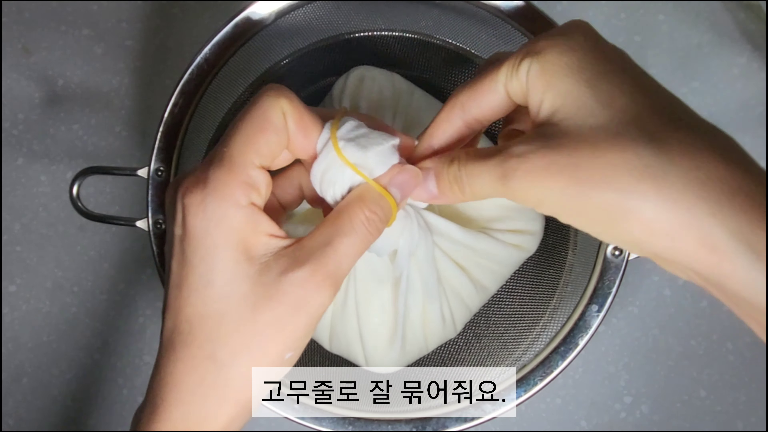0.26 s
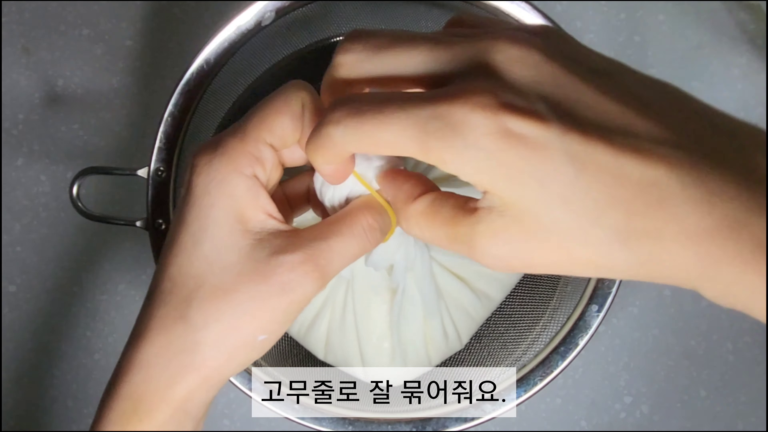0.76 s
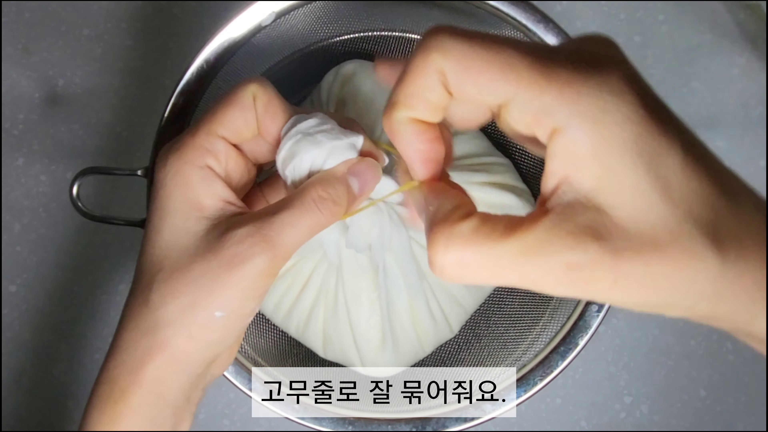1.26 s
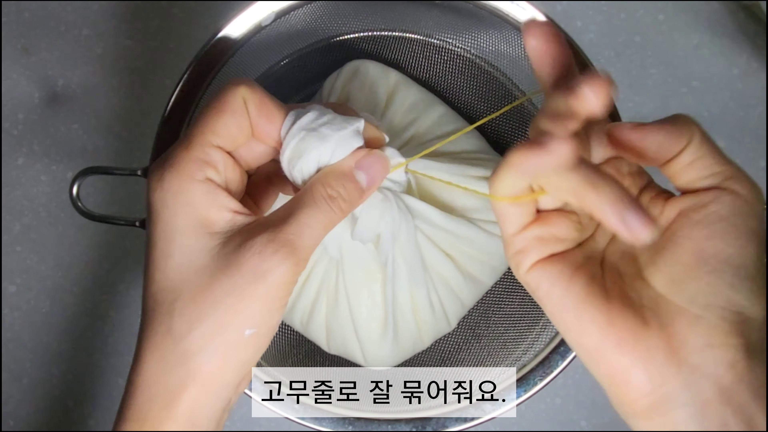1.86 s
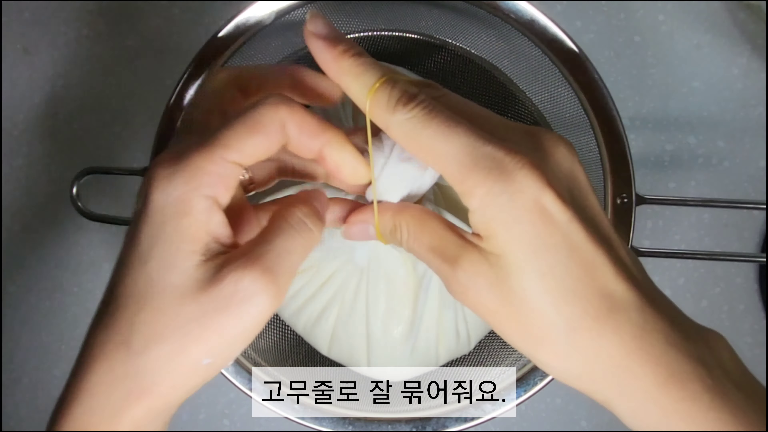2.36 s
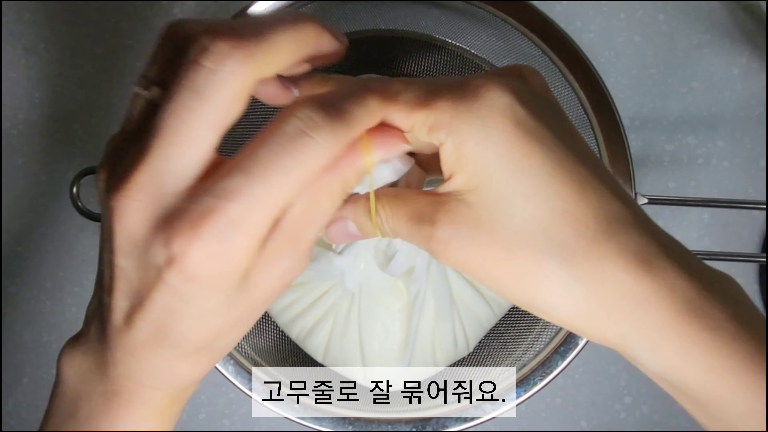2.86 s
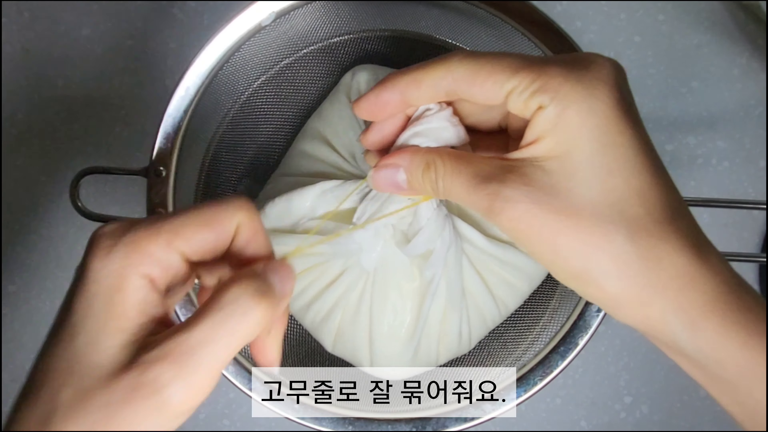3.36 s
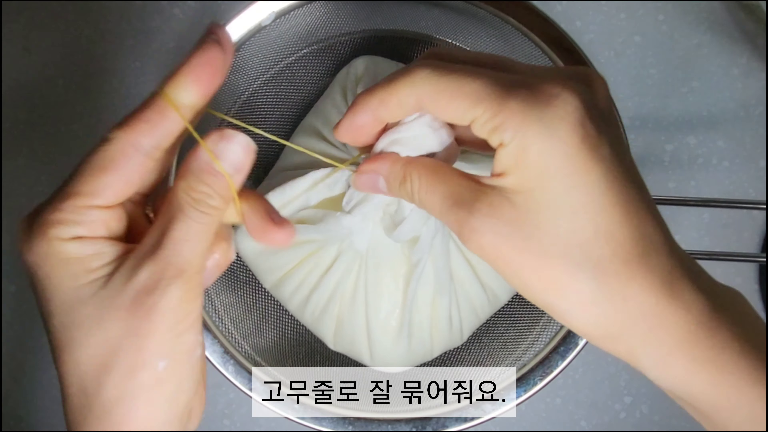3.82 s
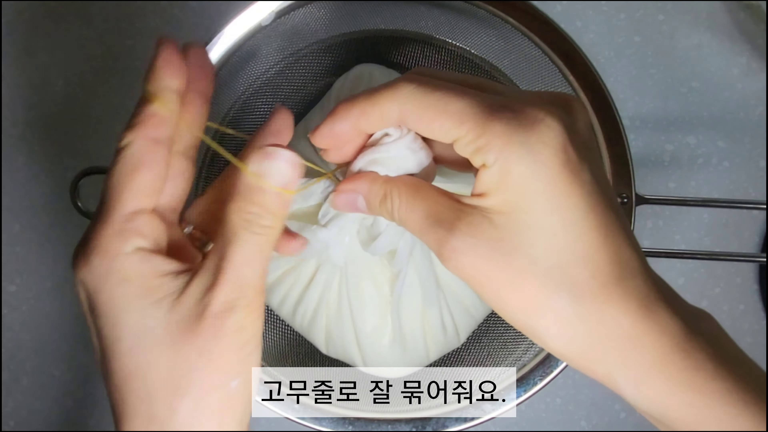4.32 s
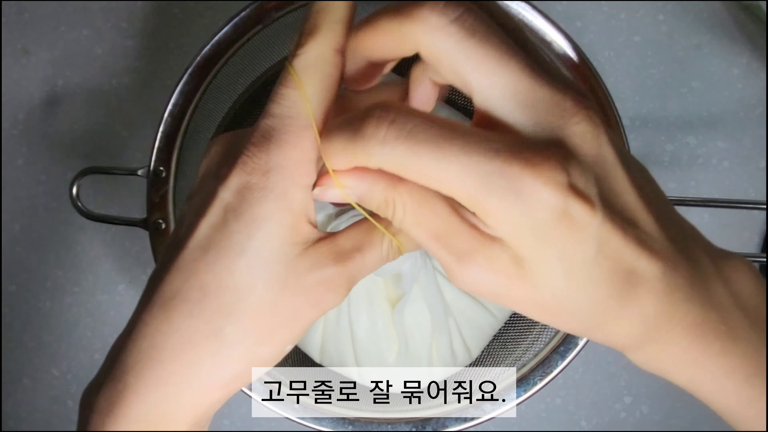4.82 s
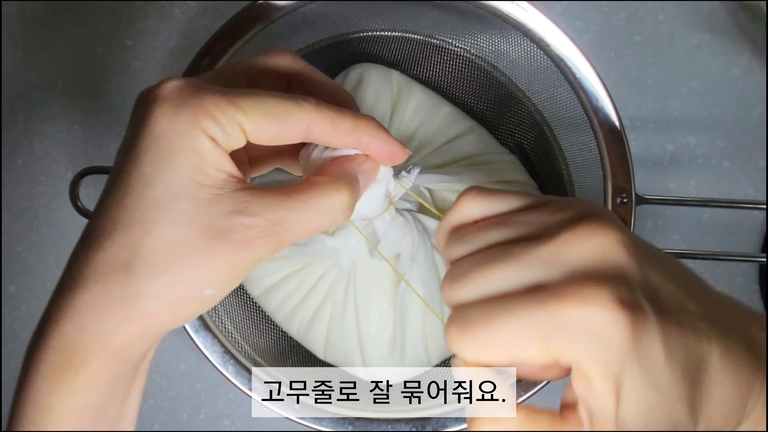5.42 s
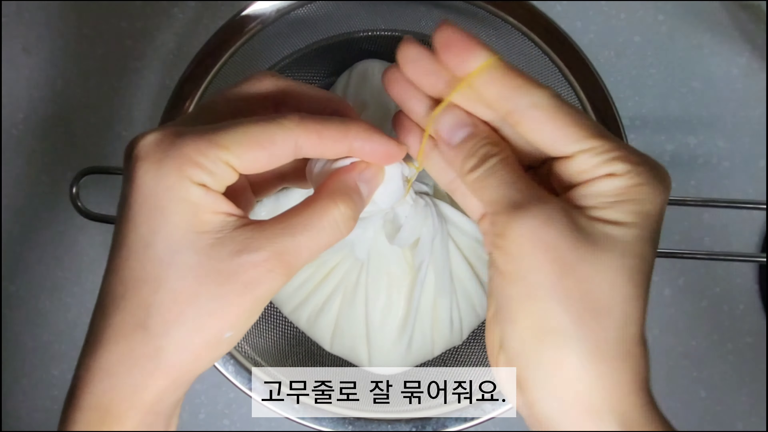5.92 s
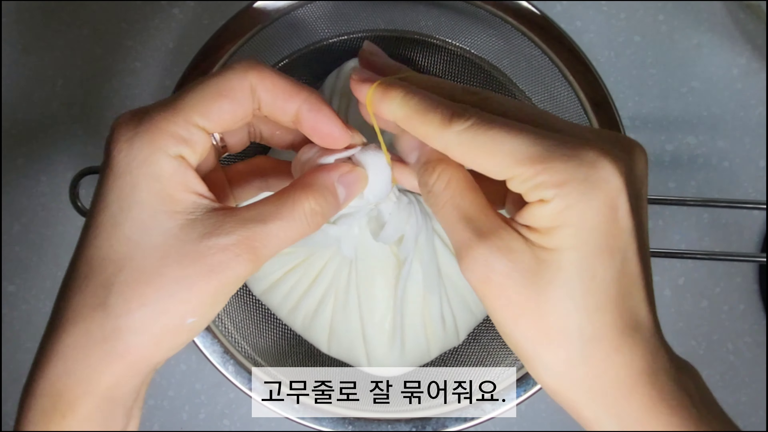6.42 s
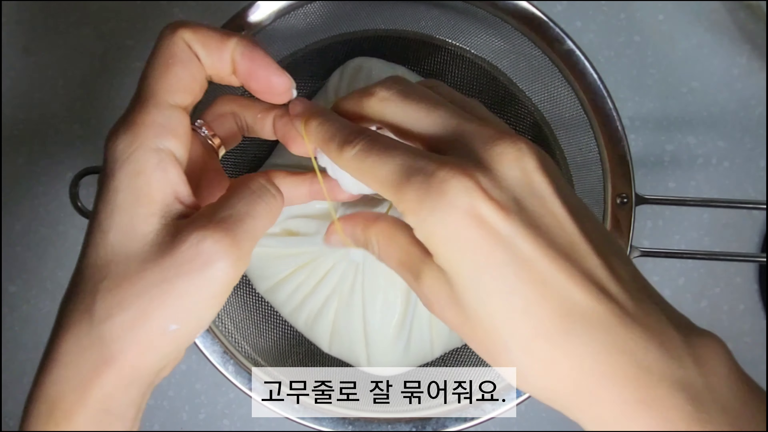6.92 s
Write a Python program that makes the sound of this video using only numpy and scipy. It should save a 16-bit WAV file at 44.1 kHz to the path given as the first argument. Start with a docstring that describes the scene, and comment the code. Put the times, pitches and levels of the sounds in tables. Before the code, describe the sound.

Close stereo pickup in a kitchen sink: fingers softly brush a cloth bundle over faint room hum, with tiny elastic ticks. A rubber band snaps bright and dry, first weakly, then strongly around three seconds. Later snaps follow among rustles, a low engine drone swells and climbs outside, and the hardest snap comes at the very end.

```python
"""Fingers hiss on cloth over a faint room hum; then a rubber band ticks and snaps as hands wind it round
the neck of a cloth bundle in a steel strainer in a kitchen sink. Impacts are shaped noise bursts, freed
strands are decaying sines, rubs are swelling noise and the shifting bundle is a low, wavering sine. Basin
resonances, a near-wall echo and kitchen tails answer. A low drone, like an engine outside, swells and
climbs: gliding sines over rumbling noise."""
import sys
import numpy as np
from scipy import signal
from scipy.fft import rfft, irfft, next_fast_len
from scipy.io import wavfile
from scipy.ndimage import map_coordinates

SR = 44100
rng = np.random.default_rng(int(sys.argv[2]) if len(sys.argv) > 2 else 0)


def waveform_to_disk(signal):
    """Save audio, clipped to [-1, 1], as 16-bit WAV at the path in sys.argv[1]."""
    frames = np.transpose(np.atleast_2d(signal))
    scaled = np.clip(frames, -1, 1) * 32767
    samples = np.round(scaled).astype(np.int16)
    wavfile.write(sys.argv[1], SR, samples)


N = 316638  # samples

# Source levels precede any trims passed in scene(); noise spectra are relative, as noise() sets rms to 1.
# band snaps home: start_s, crack_db, crack_tilt_db_per_octave, hollow_low_hz, hollow_high_hz, hollow_gain_db,
# slap_re_crack_db, slap_pitch_hz, thud_re_crack_db, left_minus_right_db
SNAPS = [(1.5053, -49.5, 0.7, 7700, 9900, 7.1, -7.5, 1020, -7, 1.2),
         (2.2972, -43, 0.3, 6050, 9700, 7.5, -19, 1200, -18, -0.73),
         (3.2785, -31.5, -0.2, 7500, 9400, 5, -11.5, 1220, -20, 2),
         (4.7121, -38, 0, 6350, 9600, 15, -5.5, 1130, -17, 1.8),
         (5.4035, -52.5, 0, 6480, 9000, 3, 1, 1150, -7, 0),
         (5.4284, -45, -4.5, 3200, 10300, 3.3, 4, 940, -4, 1.5),
         (6.432, -42, 1.5, 6285, 8000, 2.4, -7, 901, -10, -0.26),
         (7.1748, -20, 0, 3490, 6000, 3.3, -7, 1240, -24, -1)]
# small slips of the band: start_s, tick_db, slap_re_tick_db
TICKS = [(0.5806, -62, -30), (0.821, -66, -27), (1.2075, -65, -5), (1.478, -56, -27), (1.5014, -56, -6),
         (1.562, -64, -16), (2.203, -63.5, -18), (2.545, -70, 2.5), (3.252, -50.5, -11), (3.3265, -56, -6),
         (3.447, -53.5, -21), (3.683, -65, -25), (3.825, -52, -10), (4.048, -56.5, -24),
         (4.0841, -47.5, -11), (4.575, -63.5, -0.5), (4.784, -55.5, -10), (5.272, -62, -2),
         (5.2895, -62, -4), (5.333, -61, -2), (5.478, -48.5, -12.5), (6.8462, -60, -15),
         (7.0885, -52.5, -18), (7.151, -58.5, -15)]
# stretched strands left ringing: start_s, settled_pitch_hz, level_db
TWANGS = [(3.281, 468, -37.5), (3.279, 235, -46), (3.308, 205, -40.5), (3.305, 118, -39),
          (3.305, 90, -43.5), (5.428, 370, -35.5), (5.429, 720, -41.5), (6.432, 412, -34.5),
          (7.171, 250, -36)]
# fingers rub the cloth: start_s, length_s, level_db, pressure_0_to_1
RUBS = [(0.0, 0.11, -70, 0.16), (0.084, 0.24, -76.5, 0.14), (0.289, 0.15, -78, 0.25), (0.604, 0.19, -90, 1),
        (0.635, 0.06, -83, 0), (1.203, 0.035, -74.5, 0.4), (1.322, 0.091, -74.5, 0.05),
        (1.396, 0.12, -79, 0), (1.709, 0.07, -82, 0), (1.882, 0.11, -79, 0), (1.995, 0.06, -77.5, 0.13),
        (2.031, 0.19, -83.5, 0.16), (2.319, 0.31, -76, 0.43), (2.407, 0.051, -71, 0.34),
        (2.63, 0.14, -78, 0.67), (2.819, 0.06, -81, 0.2), (2.947, .05, -87, 0), (3.123, 0.055, -81, .1),
        (3.486, 0.046, -81, 0.2), (3.66, 0.099, -77.5, 0.05), (4.039, 0.025, -71, 0),
        (4.637, 0.12, -76.5, 0.76), (4.771, 0.26, -78, 0.58), (5.089, 0.22, -76, 0.55),
        (5.246, 0.095, -73, 0.49), (5.309, 0.11, -75, 0.6), (5.56, 0.057, -79, .1), (5.747, .04, -80, 0),
        (5.861, 0.15, -75.5, 0.03), (5.94, 0.16, -72, 0), (6.085, 0.05, -73.5, 0.26),
        (6.145, 0.054, -75.5, 0.24), (6.484, 0.087, -76.5, 0.45), (6.637, 0.13, -78, 0.95),
        (7.095, 0.24, -72, 0.4)]
# bundle shifts in the strainer: start_s, length_s, pitch_hz, level_db (centres of the waver)
SHIFTS = [(5.744, 0.05, 75, -52.5), (5.786, 0.11, 115, -49), (5.981, 0.083, 90.6, -55.5)]
# band whipping cloth: freq_hz, density_db_per_hz
CRACK_SPECTRUM = [(200, -46), (1500, -17.5), (3500, -11.5), (5000, -5.5), (6300, -7.5), (7700, -4),
                  (9600, -7), (11500, -4), (14000, -4.5), (16000, -16)]
# band on skin: freq_hz, density_db_per_hz
SLAP_SPECTRUM = [(200, -36), (640, -22), (900, -3.5), (1200, 0), (2100, -6.5), (3300, -10), (5000, -14.5),
                 (9000, -39), (16000, -65)]
# jolt of the soft bundle: freq_hz, density_db_per_hz
THUD_SPECTRUM = [(30, -43), (100, -3), (250, -4.5), (400, -14), (750, -13.5), (1300, -25), (3000, -54),
                 (8000, -90)]
# band slipping over folds: freq_hz, density_db_per_hz
TICK_SPECTRUM = [(200, -52), (1500, -18), (3500, -18), (5000, -7.5), (6300, -5.5), (7700, -1.5), (9600, -6),
                 (11500, -5), (14000, -6.5), (16000, -13)]
# hiss on the weave before tilt: freq_hz, density_db_per_hz
CLOTH_SPECTRUM = [(1500, -14), (3500, -12.5), (5200, -5), (7500, -1.5), (10000, 0), (12000, 1.5),
                  (16000, -1)]
# low rustle of the bundle: freq_hz, density_db_per_hz
BUNDLE_SPECTRUM = [(30, -39), (120, -33), (250, -3), (420, 6), (700, -1), (1200, -16), (2700, -14),
                   (4000, -33), (9000, -40), (16000, -68)]
# resonances of basin and strainer: centre_hz, width_hz, gain_db
BASIN_MODES = [(1222, 36, -5), (1740, 25, -11), (2260, 70, -2), (2860, 76, -8), (5810, 160, -7),
               (6490, 140, -1.5), (8470, 110, -13), (9100, 220, -7)]
# decay of the kitchen: freq_hz, t60_s
KITCHEN_T60 = [(200, 0.35), (1500, 0.34), (6000, 0.31), (15000, 0.17)]
# engine throb, first order: time_s, pitch_hz, level_db
DRONE = [(3.7, 28.84, -66), (3.77, 28.5, -57.5), (4.35, 33.62, -41), (4.6, 33.6, -50.5), (4.71, 33.47, -47),
         (5.0, 31.78, -58), (5.32, 33.98, -40), (5.7, 36.68, -78), (5.74, 36.78, -56), (6.01, 40.9, -43),
         (6.17, 43, -66), (6.28, 46.06, -47.5), (6.37, 48.82, -50.5), (6.45, 50.13, -49), (7.15, 51.4, -57),
         (7.18, 50.6, -55)]
# higher engine whine: time_s, pitch_hz, level_db
WHINE = [(5.55, 178, -76), (6.0, 198, -63), (6.25, 203, -58.5), (6.45, 218, -58), (6.75, 224, -59.5),
         (7.18, 218, -55)]
# engine rumble: freq_hz, density_db_per_hz
RUMBLE_SPECTRUM = [(30, -26), (70, -1), (125, 2), (200, -4.5), (290, -11.5), (450, -12.5), (800, -23.5),
                   (1500, -29.5), (2600, -35), (7000, -60)]
# rise of the rumble: time_s, level_db
APPROACH = [(0, -85), (3.2, -65.5), (4.3, -62.5), (7.18, -54)]
# room air: freq_hz, density_db_per_hz
AIR_SPECTRUM = [(20, -15), (65, 1.5), (96, -13), (122, -8), (165, -18), (215, -15.5), (300, -27),
                (450, -28), (950, -34), (1290, -44), (3500, -50), (6000, -50), (7400, -44), (8200, -50),
                (9800, -44), (11300, -45), (11900, -49.5)]
# appliance lines: pitch_hz, level_db (centres of the waver)
HUM = [(59.2, -80), (210, -76), (813, -91), (931, -87.5)]
# stereo likeness of noise: freq_hz, left_right_likeness_0_to_1
ALIKE = [(50, 1), (130, 0.63), (290, 0.86), (640, 0.13), (1400, 0)]
# colour of both microphones: freq_hz, gain_db
MIC_COLOUR = [(600, 0), (1000, -0.5), (1500, 0.5), (3200, 1.5), (4000, 1.5), (5000, 1), (10000, 1),
              (13000, -1), (16000, 0)]
# microphone imbalance: freq_hz, left_minus_right_db
MIC_LEAN = [(70, 1), (200, -6), (420, -2), (700, -4), (1200, -1), (2000, -0.5), (5000, -0.5), (7000, 0.5),
            (9300, 7.5), (12000, 1), (15000, 3.5)]

HOLLOW_WIDTH_OCTAVES = 0.1  # hollow between the cupped hands
RING_T60_S, RING_REF_HZ, RING_SLOPE = 0.11, 195, 1.45  # t60 at the reference pitch; power of its fall with pitch
LIGHT_TILT_DB_PER_OCTAVE, PRESS_TILT_DB_PER_OCTAVE = 0.95, -14.5  # lightest touch; added by full pressure
PRESS_RANGE_DB = 28.5  # rustle gain from no pressure to full
CATCHES_PER_S, CATCH_DB, CATCH_SPREAD_DB = 420, -6, 4  # level re the hiss at full pressure; strength scatter
BASIN_SHARE = 0.98  # part of the impacts passing the basin filter
ECHO_DELAY_S, ECHO_DB = 0.0085, -15
ROOM_DB = -8  # kitchen re direct sound
WHINE_FLUTTER = 0.3  # 0-1
BAND_LIMIT_HZ = 15950


def snaps(crack_db, slap_db, thud_db):
    """The band whips cloth (crack, coloured by the cupped hands), slaps skin and jolts the soft bundle (thud)."""
    out = np.zeros((2, N))
    for start_s, db, tilt, low_hz, high_hz, hollow_db, slap, slap_hz, thud, pan_db in SNAPS:
        crack_spectrum = tilted(CRACK_SPECTRUM, tilt)
        crack = burst(crack_spectrum, t60_s=0.066, hollow_hz=(low_hz, high_hz), hollow_db=hollow_db)
        skin = burst(pitched(SLAP_SPECTRUM, slap_hz), t60_s=0.073)
        body = burst(THUD_SPECTRUM, t60_s=0.14)
        snap = amp(crack_db) * crack + amp(slap + slap_db) * skin + amp(thud + thud_db) * body
        side_db = pan_db * np.array([[0.5], [-0.5]])
        add(out, start_s, amp(db + side_db) * snap)
    return out


def ticks(tick_db, slap_db):
    """Small slips of the band over folds and fingertips: a bright burst plus a skin slap."""
    out = np.zeros((2, N))
    for start_s, db, slap in TICKS:
        tick = amp(tick_db) * burst(TICK_SPECTRUM, t60_s=0.079)
        skin = amp(slap + slap_db) * burst(SLAP_SPECTRUM, t60_s=0.13)
        add(out, start_s, amp(db) * (tick + skin))
    return out


def burst(spectrum, t60_s, hollow_hz=(), hollow_db=0.0, direct_t60_s=0.012, rough_db=2.5):
    """One impact: sharp spike and dense basin echoes, coloured by any hollow, with a smooth kitchen tail."""
    t = np.arange(SR // 6) / SR
    attack = 1 - np.exp(-t / 0.001)
    spike = amp(-60 * t / direct_t60_s)
    roughness = unit(amp(rough_db * wobble(870, size=len(t))))
    echoes = amp(-60 * t / t60_s) * roughness
    coloured = noise(peaked(spectrum, hollow_hz, hollow_db), size=len(t))
    hit = coloured * attack * (spike + echoes)
    out = filtered(tail(), lambda hz: amp(along(spectrum, hz)))
    out *= amp(ROOM_DB) * np.linalg.norm(hit) / np.linalg.norm(out)
    add(out, 0, hit)
    return out


def twangs(sag):
    """A freed strand rings briefly, a slack one longest; its pitch sags as the swing dies."""
    out = np.zeros((2, N))
    t = np.arange(SR // 2) / SR
    for start_s, hz, db in TWANGS:
        t60_s = RING_T60_S * (RING_REF_HZ / hz) ** RING_SLOPE
        swing = amp(-60 * t / t60_s)
        phase = 2 * np.pi * np.cumsum(hz * (1 + sag * swing)) / SR
        attack = 1 - np.exp(-2 * t * hz)
        add(out, start_s, amp(db) * swing * attack * np.sin(phase))
    return out


def rubbing(brush_db, squeeze_db):
    """Light touches hiss on the weave; pressure dulls the hiss and makes the bundle rustle low."""
    out = np.zeros((2, N))
    for start_s, length_s, db, pressure in RUBS:
        tilt = LIGHT_TILT_DB_PER_OCTAVE + PRESS_TILT_DB_PER_OCTAVE * pressure
        hiss = amp(brush_db) * stroke(tilted(CLOTH_SPECTRUM, tilt), length_s, pressure)
        rustle_db = squeeze_db + PRESS_RANGE_DB * (pressure - 1)
        rustle = amp(rustle_db) * stroke(BUNDLE_SPECTRUM, length_s, pressure)
        add(out, start_s, amp(db) * (hiss + rustle))
    return out


def stroke(spectrum, length_s, pressure):
    """One rub: a fine, even brush under a hand swell; pressure makes the catching fibres louder."""
    n = max(round(length_s * SR), 256)
    grains = unit(amp(1.2 * wobble(453, size=n) + 0.6 * wobble(59, size=n)))
    brush = grains * noise(spectrum, size=n)
    catches = pressure * amp(CATCH_DB) * crackle(spectrum, n)
    return swell(n) * unit(brush + catches)


def crackle(spectrum, size):
    """Single fibres catch and let go: tiny decaying noise clicks of uneven strength."""
    strength = amp(CATCH_SPREAD_DB * rng.standard_normal(size))
    clicks = (rng.random(size) < CATCHES_PER_S / SR) * strength
    t = np.arange(SR // 100) / SR
    power_decay = amp(-120 * t / 0.0089)  # amplitude t60 8.9 ms
    power = signal.fftconvolve(clicks ** 2, power_decay)[:size]
    return unit(np.sqrt(np.abs(power)) * noise(spectrum, size=size))


def shifting(waver, waver_db):
    """The heavy bundle drags over the mesh: a low judder of unsteady pitch and level."""
    out = np.zeros((2, N))
    for start_s, length_s, hz, db in SHIFTS:
        n = round(length_s * SR)
        phase = 2 * np.pi * np.cumsum(hz * (1 + waver * wobble(60, size=n))) / SR
        level = amp(db + waver_db * wobble(40, size=n))
        add(out, start_s, swell(n) * level * np.sin(phase))
    return out


def swell(size):
    """Envelope of a hand movement: it rises, then lets go more slowly."""
    return np.sin(np.pi * (np.arange(size) / size) ** 0.7)


def basin(hz):
    """Response of the direct sound plus the basin and strainer resonances."""
    response = 1
    for centre_hz, width_hz, db in BASIN_MODES:
        damping = 1j * hz * width_hz
        response = response + amp(db) * damping / (centre_hz ** 2 - hz ** 2 + damping)
    return response


def near_wall(x):
    """A near wall returns one delayed, weaker copy."""
    return filtered(x, lambda hz: 1 + amp(ECHO_DB) * np.exp(-2j * np.pi * hz * ECHO_DELAY_S))


def kitchen(x):
    """The kitchen's diffuse answer to a lasting sound, by convolution with a tail."""
    return amp(ROOM_DB) * signal.fftconvolve(x, tail(), axes=1)[:, :N]


def tail():
    """A fresh stereo noise tail from hard walls, each frequency dying at its own speed."""
    hz, t, bins = signal.stft(rng.standard_normal((2, SR // 2)), SR, nperseg=256)
    decay = amp(-60 * t / along(KITCHEN_T60, hz)[:, None])
    walls = signal.istft(bins * decay, SR, nperseg=256)[1]
    return walls / np.linalg.norm(walls[0])


def engine(drone_db, octave_db, whine_db, rumble_db):
    """Two orders of a gliding throb, a fluttering whine and a dull rumble pass the walls."""
    throb = amp(drone_db) * tone(DRONE, waver_db=0.8)
    octave = amp(octave_db) * tone(DRONE, waver_db=2.5, order=2)
    whine = amp(whine_db) * tone(WHINE, waver_db=1.2, flutter=WHINE_FLUTTER)
    rumble = amp(curves(APPROACH)[0] + rumble_db) * noise(RUMBLE_SPECTRUM)
    return throb + octave + whine + rumble


def tone(rows, waver_db, order=1, flutter=0.0):
    """One order of a gliding line; its level wavers, and flutter (0-1) roughens level and pitch together."""
    hz, db = curves(rows)
    fade = np.clip((np.arange(N) / SR - rows[0][0]) * 10 + 1, 0, 1)  # 0.1 s, ending at the first row
    phase = 2 * np.pi * order * np.cumsum(hz) / SR
    line = (1 + flutter * wobble(28)) * np.sin(phase) + flutter * wobble(28) * np.cos(phase)
    return fade * amp(db + waver_db * wobble(12)) * unit(line)


def room_tone(air_db):
    """Air noise whose bass wavers, and the unsteady hum of an appliance."""
    t = np.arange(N) / SR
    hum = np.zeros(N)
    for hz, db in HUM:
        level = np.sqrt(2) * amp(db + 1.3 * wobble(7))  # db is rms
        hum += level * np.sin(2 * np.pi * hz * t + 0.9 * wobble(9))
    air = noise(AIR_SPECTRUM)
    bass = filtered(air, lambda hz: 1 / (1 + (hz / 160) ** 4))
    wavering_bass = bass * unit(amp(1.8 * wobble(14)))
    return amp(air_db) * (air - bass + wavering_bass) + hum


def noise(spectrum, size=N):
    """Coloured stereo noise of rms 1, alike on both sides in the bass only."""
    def mid_side(hz):
        angle = np.arccos(np.clip(along(ALIKE, hz), -1, 1)) / 2
        return amp(along(spectrum, hz)) * [np.cos(angle), np.sin(angle)]

    mid, side = filtered(rng.standard_normal((2, size)), mid_side)
    return unit(np.array([mid + side, mid - side]))


def tilted(spectrum, tilt_db_per_octave):
    """A spectrum made brighter or duller."""
    return [(hz, db + tilt_db_per_octave * np.log2(hz)) for hz, db in spectrum]


def pitched(spectrum, top_hz):
    """A spectrum scaled in frequency so that its top lies at top_hz."""
    hz, db = np.transpose(spectrum)
    return np.transpose([hz * top_hz / hz[np.argmax(db)], db])


def peaked(spectrum, centres_hz, gain_db):
    """A spectrum with resonances of gain_db raised at the centres."""
    hz = np.geomspace(20, SR / 2, 400)
    bumps = sum(np.exp(-0.5 * (np.log2(hz / centre) / HOLLOW_WIDTH_OCTAVES) ** 2) for centre in centres_hz)
    return np.transpose([hz, along(spectrum, hz) + gain_db * bumps])


def wobble(knots_per_s, size=N):
    """A smooth random curve through normally distributed knots."""
    knots = rng.standard_normal(int(size * knots_per_s / SR) + 4)
    return map_coordinates(knots, [np.arange(size) * knots_per_s / SR])


def filtered(x, response):
    """x times a response of frequency, length kept."""
    n = x.shape[-1]
    m = next_fast_len(n + 8192)
    return irfft(rfft(x, m) * response(np.fft.rfftfreq(m, 1 / SR)), m)[..., :n]


def along(points, hz):
    """(freq_hz, value) points read on a log axis."""
    f, v = np.transpose(points)
    return np.interp(np.log(hz + 1), np.log(f + 1), v)


def curves(rows):
    """One value per sample for each column after the time."""
    time_s, *columns = np.transpose(rows)
    return [np.interp(np.arange(N) / SR, time_s, column) for column in columns]


def add(track, start_s, sound):
    """Mix a sound into a track in place, cut at the track's end."""
    part = track[:, round(start_s * SR):][:, :sound.shape[-1]]
    part += sound[..., :part.shape[-1]]


def amp(db):
    """Decibels to gain."""
    return 10 ** (np.asarray(db) / 20)


def unit(x):
    """x scaled to rms 1."""
    return x / np.sqrt(np.mean(x ** 2) + 1e-20)


def scene():
    """Hands work close by in the basin; a near wall and the kitchen answer softly over engine and room."""
    band = snaps(crack_db=-6.0, slap_db=-2.0, thud_db=-1.0) + ticks(tick_db=-7.0, slap_db=-3.0)
    impacts = near_wall(BASIN_SHARE * filtered(band, basin) + (1 - BASIN_SHARE) * band)
    strands = near_wall(twangs(sag=0.012))
    cloth = rubbing(brush_db=5.5, squeeze_db=14.5)
    lasting = strands + cloth + shifting(waver=0.08, waver_db=0.5)
    outside = engine(drone_db=1, octave_db=-15.0, whine_db=-1.5, rumble_db=-2.0)
    return impacts + lasting + kitchen(lasting) + outside + room_tone(air_db=-57.0)


def record(dry):
    """Left microphone brighter, right one fuller; both share a colour and pass nothing above the band limit."""
    def response(hz):
        lean_db = np.outer([0.5, -0.5], along(MIC_LEAN, hz))
        return amp(along(MIC_COLOUR, hz) + lean_db) * (hz < BAND_LIMIT_HZ)

    return filtered(dry, response)


dry = scene()
out = record(dry)
waveform_to_disk(out)
```